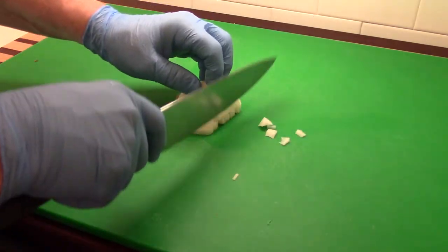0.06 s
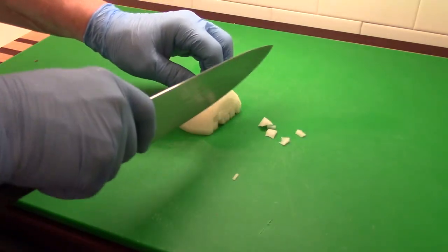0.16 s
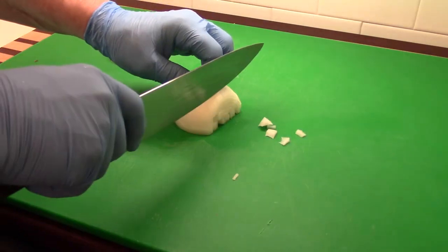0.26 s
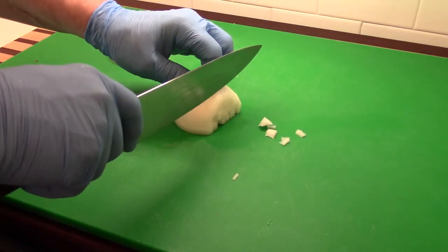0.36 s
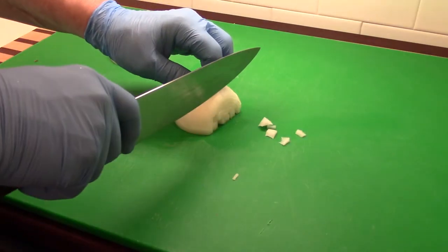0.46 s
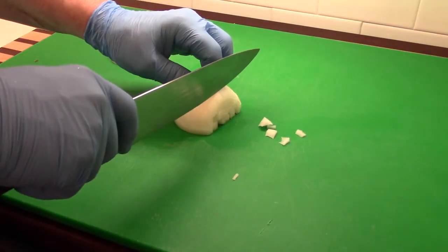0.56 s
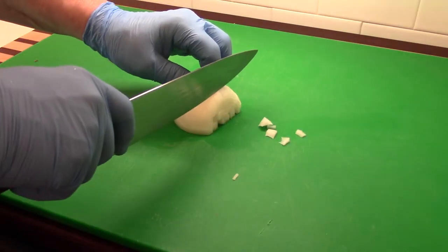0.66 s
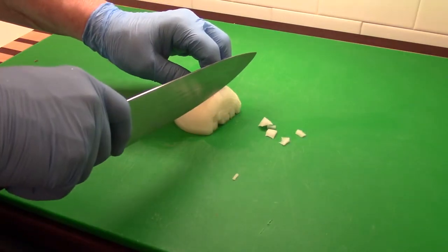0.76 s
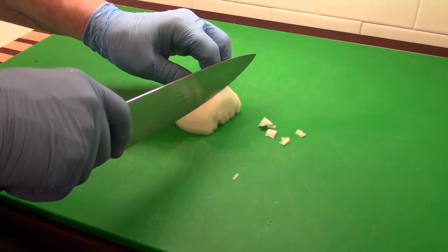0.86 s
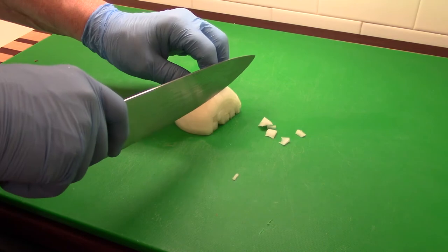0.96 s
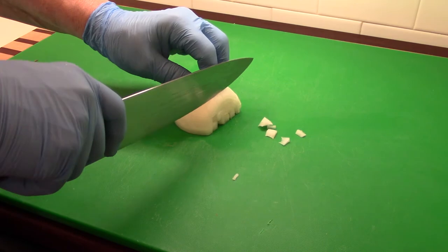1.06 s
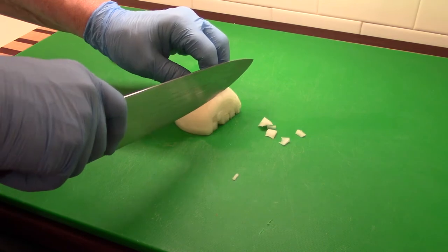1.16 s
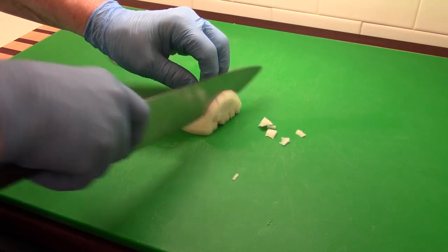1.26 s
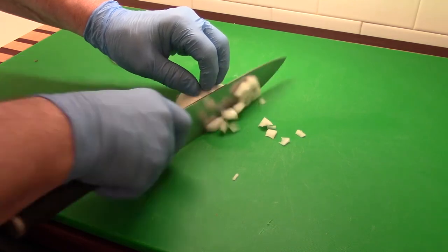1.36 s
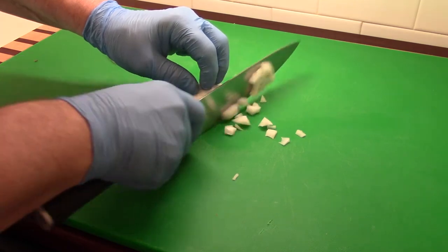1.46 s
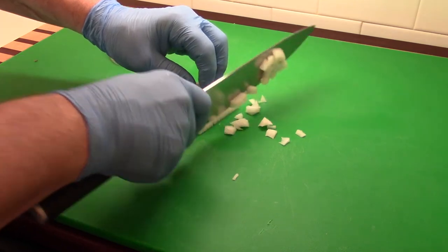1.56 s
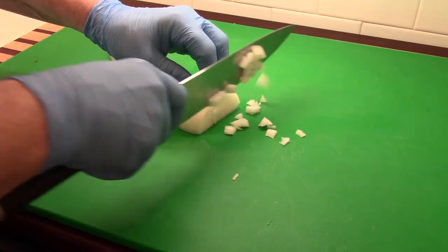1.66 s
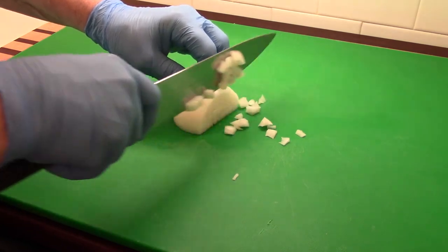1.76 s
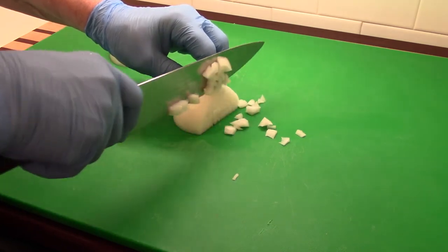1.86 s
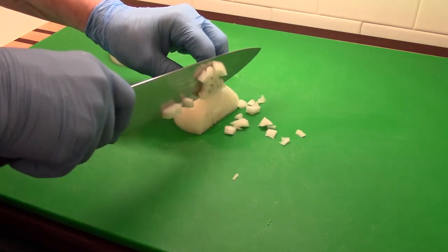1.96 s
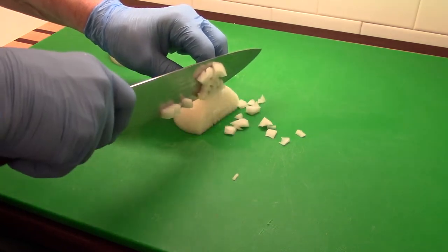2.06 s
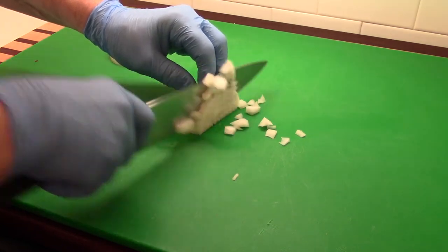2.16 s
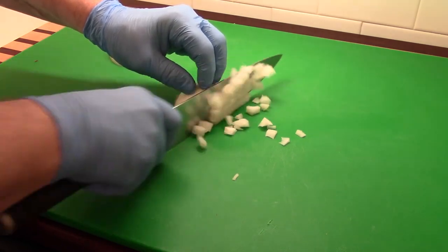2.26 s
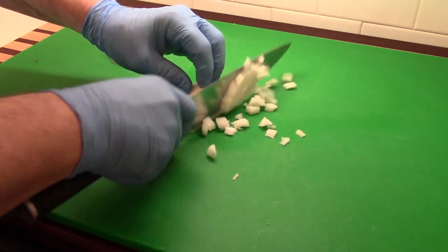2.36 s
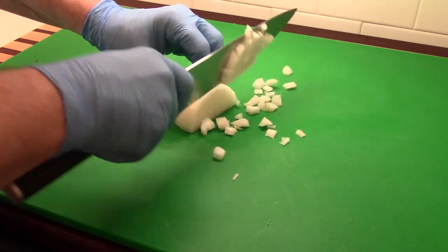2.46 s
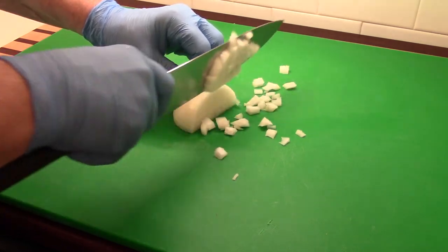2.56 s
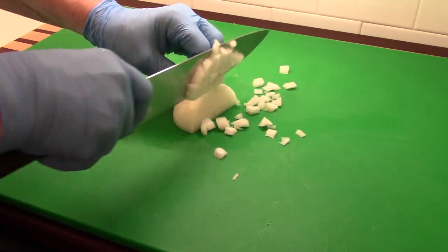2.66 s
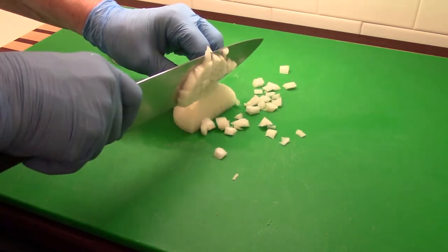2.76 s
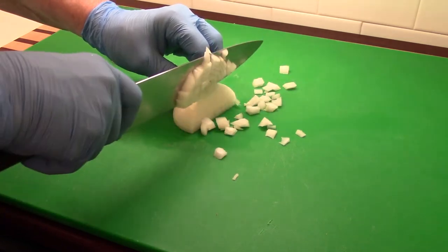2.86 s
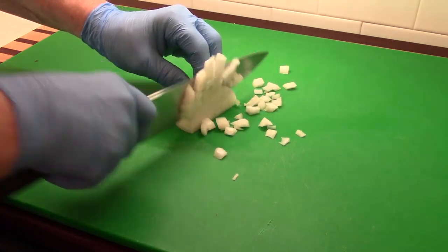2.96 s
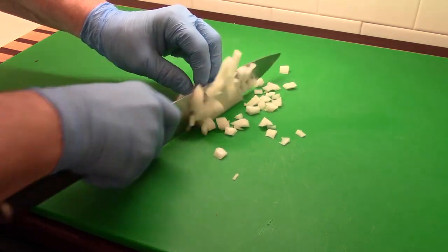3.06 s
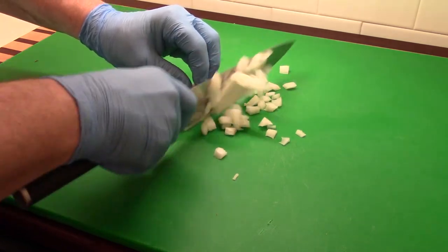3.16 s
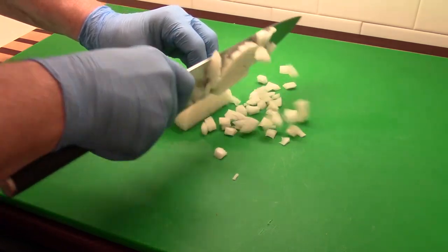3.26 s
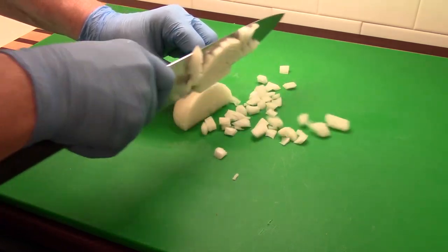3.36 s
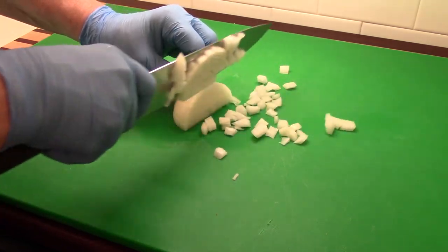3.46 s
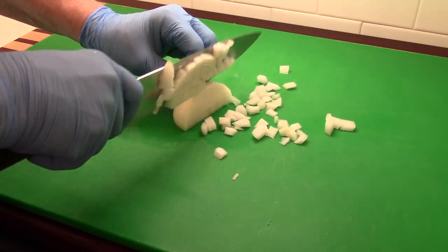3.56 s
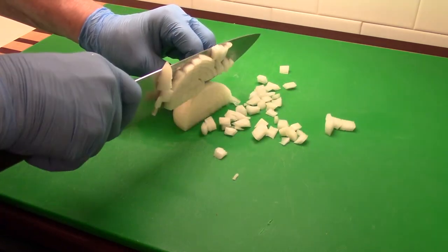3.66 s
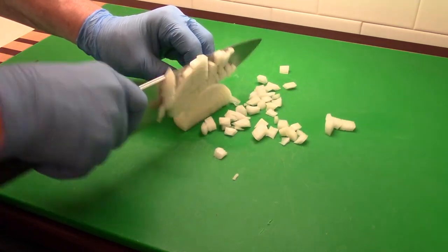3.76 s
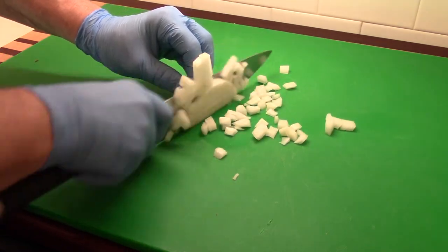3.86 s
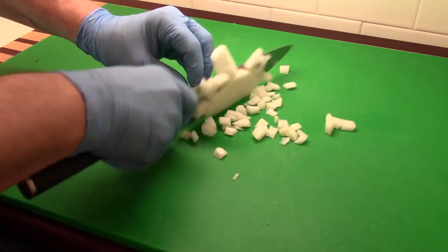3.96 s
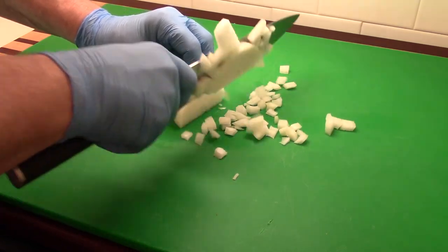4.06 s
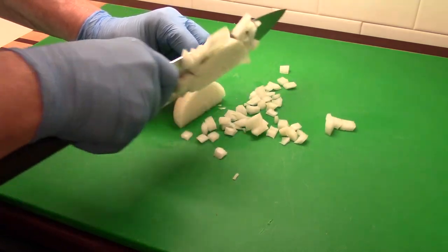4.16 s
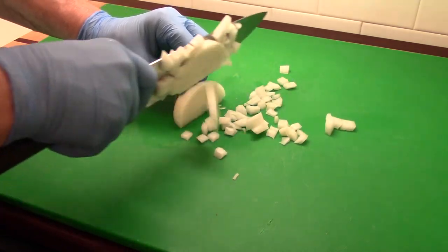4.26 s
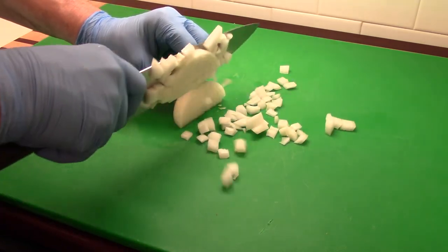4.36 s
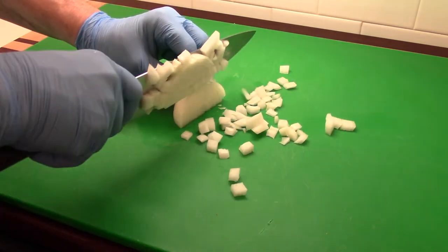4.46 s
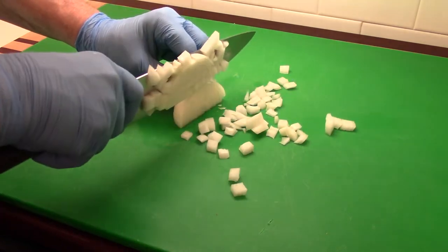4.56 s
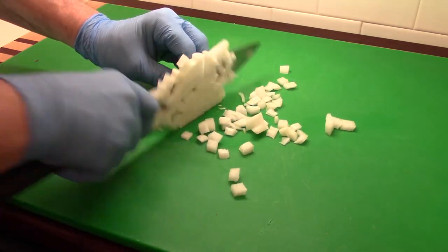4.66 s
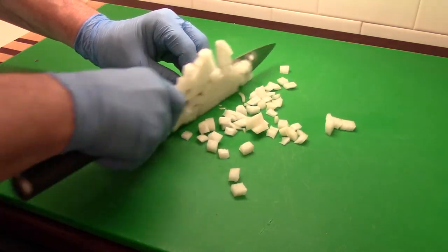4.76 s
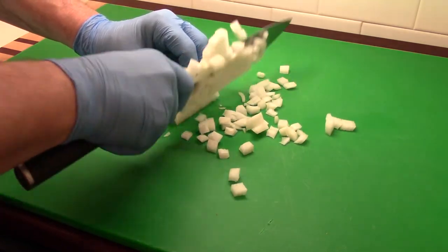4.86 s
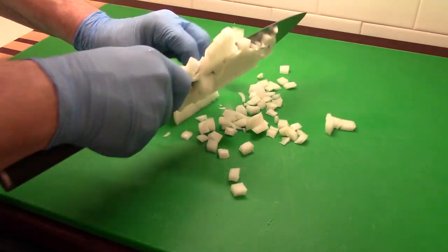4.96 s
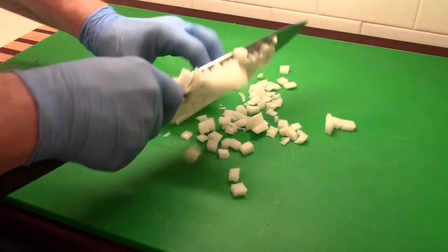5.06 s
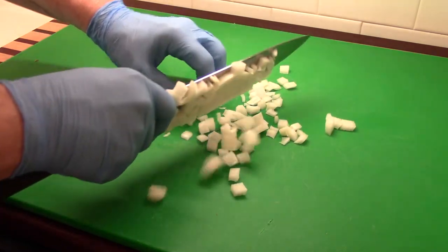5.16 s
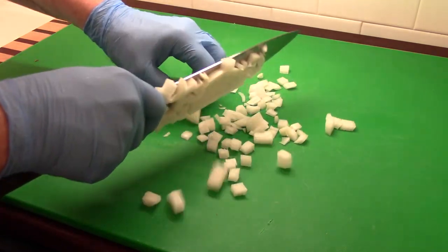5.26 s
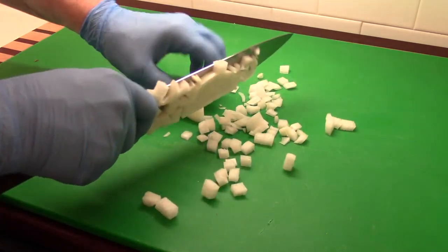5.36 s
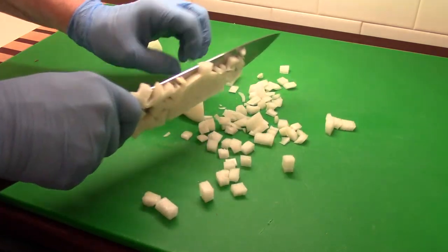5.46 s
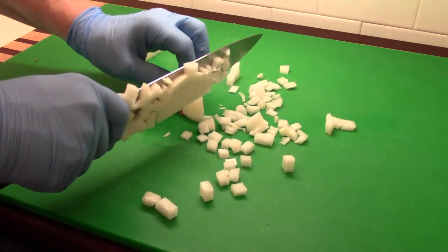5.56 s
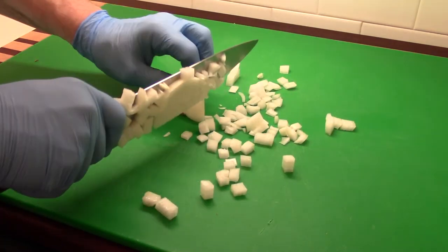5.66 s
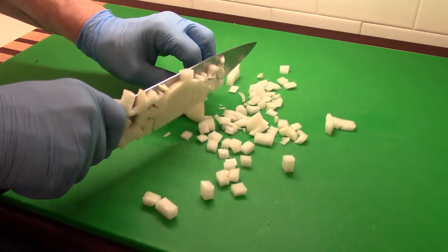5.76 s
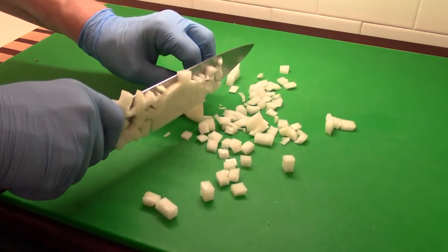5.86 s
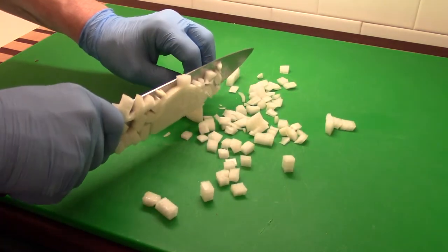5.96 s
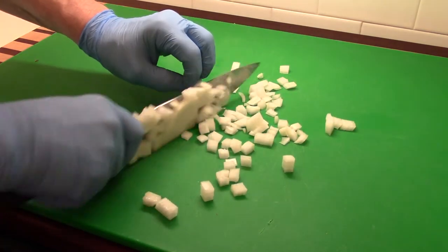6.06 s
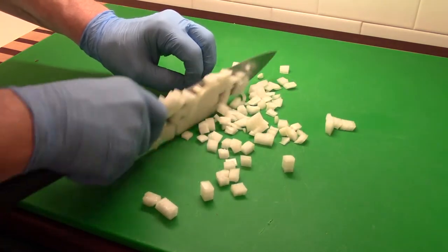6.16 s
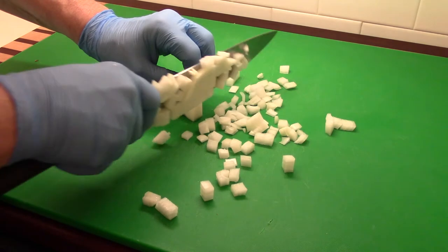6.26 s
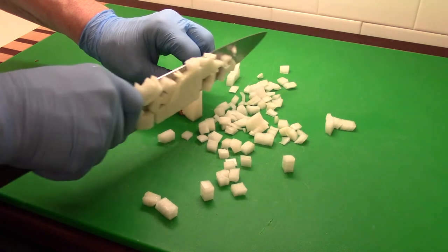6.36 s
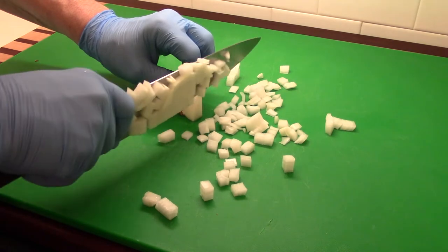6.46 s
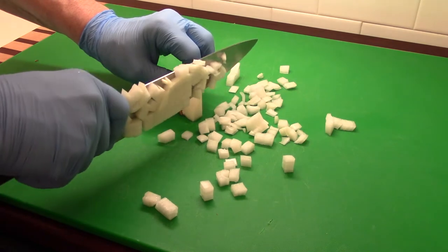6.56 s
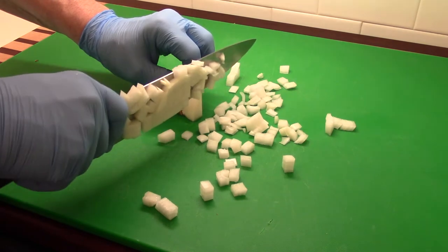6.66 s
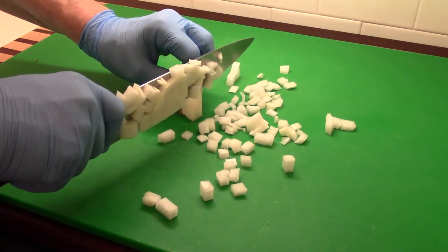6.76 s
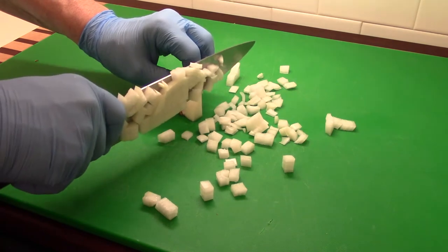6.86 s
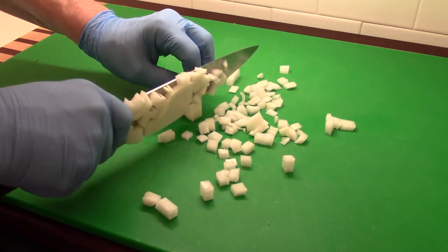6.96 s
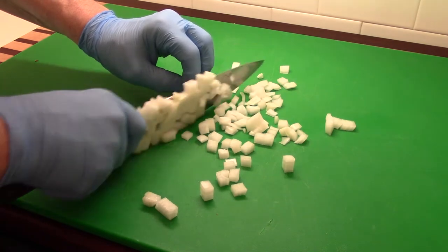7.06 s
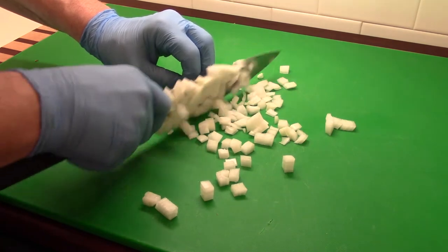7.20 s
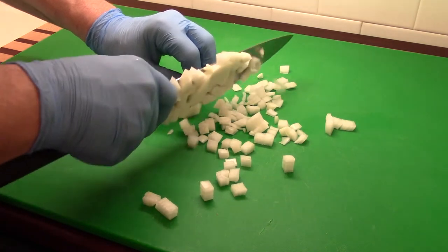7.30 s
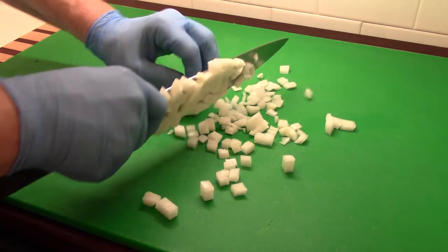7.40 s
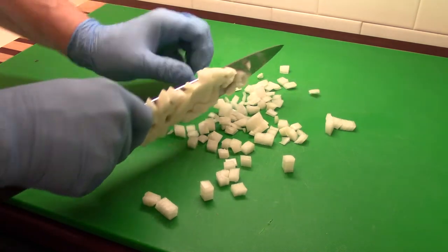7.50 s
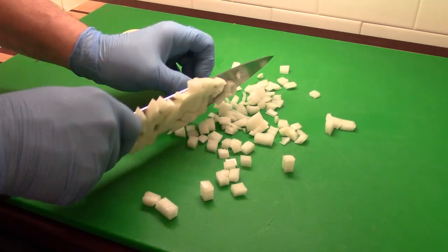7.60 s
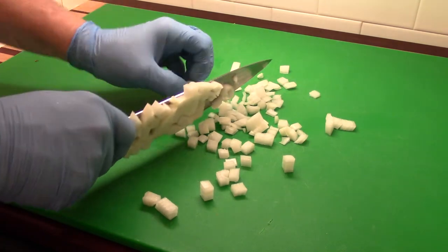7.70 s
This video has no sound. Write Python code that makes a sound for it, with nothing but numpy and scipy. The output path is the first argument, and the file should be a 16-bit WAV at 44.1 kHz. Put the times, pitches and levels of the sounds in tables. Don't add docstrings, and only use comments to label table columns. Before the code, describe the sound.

After a soft knock and a quiet opening second, a blade tears crisply through onion and thuds on the board. Six more cuts follow at an unhurried pace, each a short rising crunch ending in a hollow bang with a brief boxy room tail. Small wet pieces patter down, busiest midway. The close, centered mono pickup carries low ventilation rumble and light hiss.

```python
import sys
import numpy as np
from scipy import signal
from scipy.fft import rfft, irfft
from scipy.io import wavfile

SR = 44100
rng = np.random.default_rng(int(sys.argv[2]) if len(sys.argv) > 2 else 0)


def voltage_ratio(decibels):
    exponent = np.asarray(decibels, float) / 20
    return 10 ** exponent


def wav_out(sig):
    wavfile.write(sys.argv[1], SR, np.round(np.clip(np.atleast_2d(sig).T, -1, 1) * 32767).astype(np.int16))


N = 340968

LANDINGS_S = [
    1.3461,
    2.2284,
    3.0449,
    3.8727,
    4.7263,
    6.0759,
    7.0851,
]


def rms_one(x):
    return x / np.sqrt(np.mean(x ** 2) + 1e-20)


def peak_one(x):
    return x / np.abs(x).max()


def at_hz(points, hz):
    table_hz, values = np.transpose(points)
    return np.interp(np.log(hz), np.log(table_hz), values)


def coloured(x, spectrum):
    n = x.shape[-1]
    hz = np.maximum(np.arange(n // 2 + 1) * SR / n, 1)
    return rms_one(irfft(rfft(x) * voltage_ratio(at_hz(spectrum, hz)), n))


def slow(rate_hz):
    knots = rng.standard_normal(1400)
    return np.interp(np.arange(N) / SR * rate_hz, np.arange(len(knots)), knots)


def bandpass(order, low_hz, high_hz):
    return signal.butter(order, [low_hz, high_hz], "band", fs=SR, output="sos")


def split(x, hz):
    return [signal.sosfilt(signal.butter(4, hz, kind, fs=SR, output="sos"), x) for kind in ("low", "high")]


def resonate(x, hz, width_hz):
    r = np.exp(-np.pi * width_hz / SR)
    gain = (1 - r * r) / 2
    return signal.lfilter([gain, 0, -gain], [1, -2 * r * np.cos(2 * np.pi * hz / SR), r * r], x)


def ringing(modes, t, phases):
    out = np.zeros(len(t))
    for (hz, db, t60_s), phase in zip(modes, phases):
        out += voltage_ratio(db - 60 * t / np.minimum(t60_s, .6)) * np.sin(2 * np.pi * hz * t + phase)
    return out


def diffuse_noise(t60_s):
    t = np.arange(SR // 3) / SR
    return rms_one(rng.standard_normal(len(t)) * voltage_ratio(-60 * t / t60_s))


def add(out, sound, s):
    at = round(s * SR)
    out[at:at + len(sound)] += sound[:N - at]


def kitchen_rumble():
    # [f/Hz, level/dB per Hz]
    spectrum = [(11, -36.5), (18, -1), (69, -11), (87, -15.5), (126, -10), (157, -26.5), (424, -25),
                (515, -31), (554, -21), (673, -31.5), (1330, -36), (1580, -40), (6000, -49.5), (7800, -77),
                (13200, -120)]
    # [t/s, level/dB]
    swell = [(0, -50), (.4, -53.5), (.9, -55.5), (1.7, -49.5), (2.6, -52), (3.6, -51), (4.6, -48.5),
             (5.6, -54), (6.6, -52.5), (7.73, -50.5)]
    # [f/Hz, waver/Hz, level/dB rms]
    drones = [(26.9, 2.5, -47.5), (59.3, 1.2, -51.5), (112.7, 1, -61), (300, 6.3, -66.5), (603, 14, -72.5)]
    t = np.arange(N) / SR
    swell_s, low_db = np.transpose(swell)
    rush_db = -50 + .5001 * (low_db - low_db.mean())
    low, rush = split(coloured(rng.standard_normal(N), spectrum), 160)
    out = low * voltage_ratio(np.interp(t, swell_s, low_db) + slow(4))
    out += rush * voltage_ratio(np.interp(t, swell_s, rush_db) + slow(5))
    for hz, waver_hz, level_db in drones:
        turns = np.cumsum(hz + waver_hz * slow(4.3)) / SR
        out += voltage_ratio(level_db - 0.5 + 1.3 * slow(9.1)) * np.sin(2 * np.pi * turns)
    return out


def blade_ring():
    # [f/Hz, level/dB, t60/s]
    modes = [(1990, -54, .12), (2620, -52, .1)]
    out = np.zeros(N)
    add(out, ringing(modes, np.arange(SR // 5) / SR, [0, 0]), 0)
    return out


def contacts():
    # [t/s, knock peak/dB, thump/dB re knock, wet tick/dB re knock]
    pieces = [(1.73, -46.5, -0.5, -26), (1.881, -47.5, 0, -20), (2.107, -36, -29, -13),
              (2.153, -30.5, -8, -8.5), (2.541, -44, -3.5, -16), (3.258, -40.5, 5.5, -9.5),
              (3.323, -45.5, 6.5, -20), (3.356, -28.5, -13.5, -27), (3.407, -36, -27, -12.5),
              (3.504, -54, 3, -22), (3.959, -35, -13, -10.5), (4.105, -34.5, -6.5, -13.5),
              (4.155, -43, -2.5, -23), (4.329, -38.5, 5.5, -7.5), (4.365, -34, -17, -14),
              (4.384, -32, -21, -17), (4.447, -37.5, -18, -16), (4.466, -40, -18, -17),
              (4.5, -44, -14, -21), (5.149, -42, -2, -28), (5.176, -30, 3, -12), (5.265, -43, -15, -16),
              (5.294, -38.5, -2.5, -26), (5.31, -34, -25, -19), (7.281, -45, 3, -7.5),
              (7.363, -35, -7, -19), (7.407, -47, -21, -9), (7.497, -49, 11.5, -30),
              (7.515, -55.5, 16, -30), (7.705, -59, 10, -24)]
    # [t/s, knock peak/dB, wet tick/dB re knock, tick f/Hz, contact/s]
    smacks = [(0.001, -38, -11, 2320, 0.017), (0.981, -55, -5, 4200, 0.028),
              (1.503, -49.5, 0, 2460, 0.0049), (2.783, -49.5, 0, 3100, 0.0076),
              (3.237, -41.5, -8, 4800, 0.0033), (3.604, -41, 3.5, 3100, 0.006),
              (4.336, -41.5, -4, 2330, 0.0044), (4.586, -45, 1, 4300, 0.015),
              (5.022, -37.5, -9, 2200, 0.021), (5.053, -35, -5, 2200, 0.0098),
              (5.219, -50.5, 1.5, 2520, 0.0061), (6.375, -56, -1, 2770, 0.019),
              (6.399, -55, 2.5, 2780, 0.029), (6.447, -53, -8, 2940, 0.014), (6.949, -51, -5, 2390, 0.015),
              (7.546, -68, 10, 3250, 0.0064)]
    tick_hz, tick_spread, tumble_s, smack_thump_db = 2200, .07, .0058, 3
    events = []
    for s, db, thump_db, tick_db in pieces:
        piece_hz = tick_hz * (1 + tick_spread * rng.standard_normal())
        events.append((s, db, thump_db, tick_db, piece_hz, tumble_s))
    for s, db, tick_db, hz, contact_s in smacks:
        events.append((s, db, smack_thump_db, tick_db, hz, contact_s))
    return events


def drops():
    knocks, ticks = np.zeros(N), np.zeros(N)
    t = np.arange(SR // 8) / SR
    board, counter = bandpass(3, 445, 1206), bandpass(2, 200, 650)
    first_touch = 1.8 * np.hanning(SR // 1200)
    for s, db, thump_db, tick_db, tick_hz, contact_s in contacts():
        contact = rng.standard_normal((3, len(t))) * np.exp(-t / contact_s)
        contact[:2, :len(first_touch)] += first_touch
        knock = peak_one(signal.sosfilt(board, contact[0]))
        thump = peak_one(signal.sosfilt(counter, contact[1]))
        add(knocks, voltage_ratio(db) * knock + voltage_ratio(db + thump_db + 3) * thump, s)
        wet = resonate(contact[2], tick_hz, .22 * tick_hz) + voltage_ratio(-8.5) * contact[2]
        wet = resonate(wet, tick_hz, tick_hz)
        wet = split(wet, 3.1 * tick_hz)[0]
        add(ticks, voltage_ratio(db + tick_db + 3) * peak_one(wet), s)
    after = signal.fftconvolve(knocks, diffuse_noise(t60_s=0.39))[:N]
    return voltage_ratio(2.5) * knocks + voltage_ratio(-40.5) * after, ticks


def tiles(x):
    return voltage_ratio(-51.5) * signal.fftconvolve(split(x, 4900)[0], diffuse_noise(t60_s=0.66))[:N]


def board_ring(spread_db):
    # [f/Hz, level/dB, t60/s, direction of first swing]
    board = [(188, -12, .038, 1), (591, 2.6, .018, -1), (854, -.8, .15, 1), (1064, 9.6, .007, -1),
             (1114, 8.5, .012, 1), (1966, -12, .13, 1)]
    contact_hz, rebound_s, rebound = 1043, .00356, -.84
    t = np.arange(SR // 8) / SR
    modes, phases = [], []
    for hz, db, t60_s, way in board:
        detune, level = rng.standard_normal(2)
        modes.append((hz * (1 + 0.0027 * detune), db + spread_db * level, t60_s))
        phases.append(np.pi * (way < 0))
    ring = ringing(modes, t, phases)
    lag = round(rebound_s * SR)
    ring[lag:] += rebound * ring[:-lag].copy()
    r = np.exp(-2 * np.pi * contact_hz / SR)
    return peak_one(signal.lfilter([1], [1, -2 * r, r * r], ring))


def counter_and_room():
    # [f/Hz, level/dB, t60/s]
    counter = [(144.4, -12.5, 0.93), (170.4, -9, 0.1), (282, 2.5, 0.18), (380, -23, 0.21), (414, -6, 0.42),
               (490.3, 2.5, 0.49), (586, 8, 0.41), (708, -17.5, 1), (884, -39, 5.0), (971, -6, 0.68),
               (1207, -32, 0.71), (1292, -19, 1.0), (1514, -44, 0.1), (1767, -33.5, 0.19)]
    # [f/Hz, level/dB per Hz]
    colour = [(41, -45.5), (70, -19.5), (145, -9), (237, -6), (284, 1), (591, -1), (654, -3.5),
              (1130, -9.5), (1250, -13.5), (1600, -18.5), (2710, -40), (9000, -64), (11700, -97.5),
              (19800, -120)]
    # [f/Hz, t60/s]
    decay = [(100, 0.5), (260, 0.32), (700, 0.39), (1800, 0.42), (5000, 0.52)]
    t = np.arange(SR // 2) / SR
    struck = []
    for hz, db, t60_s in counter:
        for apart in (.968, 1, 1.027):
            struck.append((hz * apart, db - 4 + 2 * rng.standard_normal(), t60_s))
    modes = ringing(struck, t, rng.uniform(0, 2 * np.pi, len(struck)))
    noise = coloured(rng.standard_normal(len(t)), colour)
    diffuse = np.zeros(len(t))
    edges_hz = 60 * 2 ** np.arange(0, 8, .5)
    for low_hz, high_hz in zip(edges_hz, edges_hz[1:]):
        band = signal.sosfilt(bandpass(2, low_hz, high_hz), noise)
        diffuse += band * voltage_ratio(-60 * t / at_hz(decay, np.sqrt(low_hz * high_hz)))
    rise = 1 - np.exp(-(t / 0.009) ** 2)
    return rise * (voltage_ratio(-30) * modes + voltage_ratio(-9) * diffuse)


def effort():
    # [entry t/s, gather/s, crackle at landing/dB, juice/dB re crackle, climb/dB per s]
    strokes = [
        (1.201, 0.036, -44.5, -8, 17),
        (2.132, .008, -43.5, -7.5, 6.5),
        (2.9, 0.019, -43, -10.5, 31.5),
        (3.754, 0.0086, -43.5, -9, 21),
        (4.62, 0.0082, -39, -14, 91),
        (5.96, .03, -56, -5, 132),
        (6.975, 0.012, -47, -14.5, 130),
    ]
    presses_db = [0.5, 7, 0.5, -0.5, 1, 0, -3.5]
    # [t/s, crackle/dB, juice/dB re crackle, push/dB re crackle]
    bites = [
        (2.108, -48, -8.5, 12.5),
        (2.893, -57.5, -16.5, 13),
        (3.739, -53.5, -9, 7),
        (4.583, -48, -22, 1),
        (5.975, -61, -15, 10),
        (6.012, -59.5, -19, 14.5),
        (6.929, -60.5, -25, 17),
        (6.95, -55, -15, 9),
    ]
    attack_s, fade_db_per_s = 0.0041, 349
    t, layers = np.arange(N) / SR, np.zeros((4, N))
    for lands_s, press_db, (s, gather_s, db, juice_db, climb) in zip(LANDINGS_S, presses_db, strokes):
        on = (t >= s) & (t < lands_s + .002)
        push_db = -39.5 + 0.18 * (db + 44)
        levels_db = np.array([db, db + juice_db, push_db, push_db + press_db])
        juice_climb = 86 + 0.61 * climb
        climbs = [climb, juice_climb, 0.56 * climb, 0.56 * climb]
        entry_db = -14.5 * np.exp(-(t[on] - s) / gather_s)
        layers[:, on] += voltage_ratio(entry_db + np.outer(climbs, t[on] - lands_s) + levels_db[:, None])
    for s, db, juice_db, push_db in bites:
        on = (t >= s - 4 * attack_s) & (t < s + .1)
        late_s = t[on] - s
        shape_db = np.where(late_s < 0, 8 * late_s / attack_s, -fade_db_per_s * late_s)
        levels_db = db + np.array([0, juice_db, push_db, push_db + 0.5])
        layers[:, on] += voltage_ratio(shape_db + levels_db[:, None])
    return layers * voltage_ratio(1.5 * slow(170))


def cuts(response):
    # [f/Hz, level/dB per Hz]
    spectrum = [(820, -34), (1400, -3), (1730, -0.5), (2230, -6.5), (3210, -0.5), (4010, -4.5), (4390, -5),
                (7890, -14.5), (10200, -17.5), (15700, -41.5)]
    # [f/Hz, width/Hz, level/dB]
    blade = [(2720, 180, -1), (4550, 200, -8.5), (2310, 360, 0.5)]
    unevenness = voltage_ratio([4.8 * slow(60) for _ in range(4)])
    crackle, fizz, push, press = effort() * unevenness
    sizes = voltage_ratio(2.8 * np.minimum(rng.exponential(1, (3, N)), 4))
    signs = rng.choice([-1, 1], (3, N))
    grains_per_s = np.array([[9000], [1200], [800]])
    grains = sizes * signs * (rng.random((3, N)) < grains_per_s / SR)
    shake = signal.fftconvolve(push * rms_one(grains[1]), response)[:N] / np.sqrt(np.sum(response ** 2))
    low = press * rms_one(resonate(resonate(grains[2], 110, 140), 140, 150))
    cells = coloured(grains[0], spectrum)
    rung = cells.copy()
    for hz, width_hz, db in blade:
        grip_db = 5 * slow(45)
        rung += voltage_ratio(db + 1.5 + grip_db) * resonate(cells, hz, width_hz)
    dull, bright = split(rung, 6930)
    crunch = crackle * rms_one(dull) + fizz * rms_one(bright)
    return voltage_ratio(0.5) * shake + voltage_ratio(-7) * low, voltage_ratio(-2.5) * crunch


def chops(tail):
    # [peak/dB, edge crack/dB re 1, tail/dB re peak, tail brightness/dB]
    blows = [
        (-5.5, -29.5, 1.5, 4.5),
        (-1.5, -32, 1.5, 0.5),
        (-2.5, -28, 2.1, 1.2),
        (-1, -26, 0.5, 1),
        (-2.5, -25.5, 4, 1),
        (-4.5, -27, 3, -0.3),
        (-4, -30, 3.5, -1.7),
    ]
    out, t = np.zeros(N), np.arange(SR // 40) / SR
    dull = bandpass(3, 1300, 4500)
    for s, (db, crack_db, tail_db, bright_db) in zip(LANDINGS_S, blows):
        add(out, voltage_ratio(db) * board_ring(spread_db=1.5), s)
        wash = .8 * tail + .6 * counter_and_room()
        wash = wash + (voltage_ratio(bright_db) - 1) * split(wash, 1250)[1]
        add(out, voltage_ratio(db + tail_db) * wash, s)
        crack = signal.sosfilt(dull, rng.standard_normal(len(t)) * np.exp(-t / 0.0027))
        add(out, voltage_ratio(crack_db + 7.5) * crack, s + 0.00072)
    return out


def scene():
    tail = counter_and_room()
    response = voltage_ratio(12) * tail
    response[:SR // 8] += board_ring(spread_db=-1)
    knocks, ticks = drops()
    shake, crackle = cuts(response)
    mono = kitchen_rumble() + blade_ring() + knocks + ticks + shake + crackle
    mono += tiles(ticks + crackle) + chops(tail)
    return np.stack([mono, mono])


def roll_off(x):
    return signal.sosfilt(signal.butter(12, 16120, fs=SR, output="sos"), x)


def record(dry):
    # [f/Hz, level/dB per Hz]
    hiss_spectrum = [(20, -16.5), (50, -11), (130, -5.5), (270, -5), (2000, -6), (4000, -5.5), (9000, -7),
                     (15800, -9.5)]
    hiss_db, peak_limit, cutoff_hz = -64, .62, 15760
    hiss = voltage_ratio(hiss_db) * coloured(rng.standard_normal((2, N)), hiss_spectrum)
    rounded = dry / (1 + np.abs(dry / peak_limit) ** 4) ** .25
    top_cut = signal.cheby2(12, 60, cutoff_hz + 350, fs=SR, output="sos")
    return roll_off(signal.sosfilt(top_cut, rounded + hiss))


dry = scene()
out = record(dry)
wav_out(out)
```